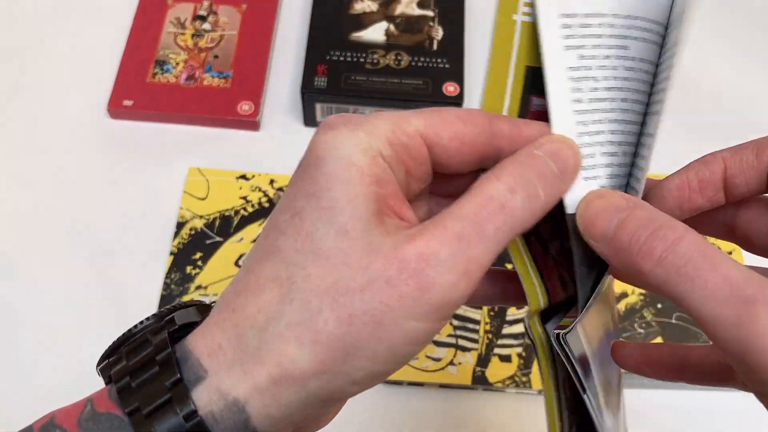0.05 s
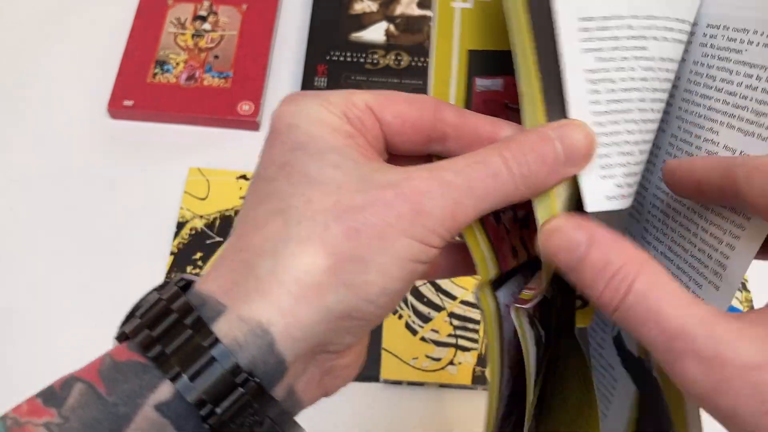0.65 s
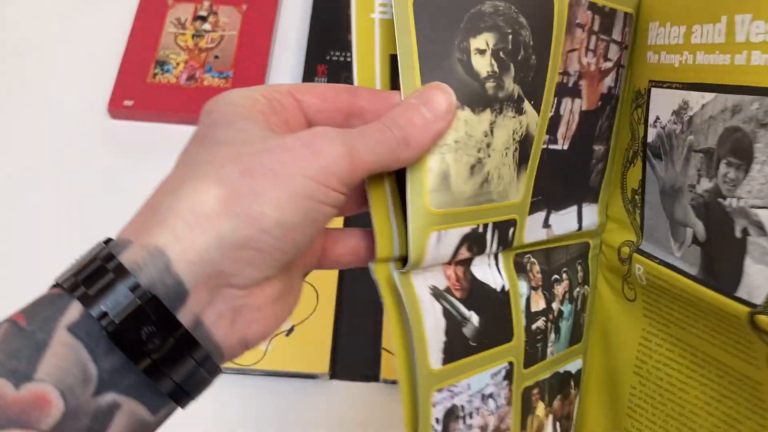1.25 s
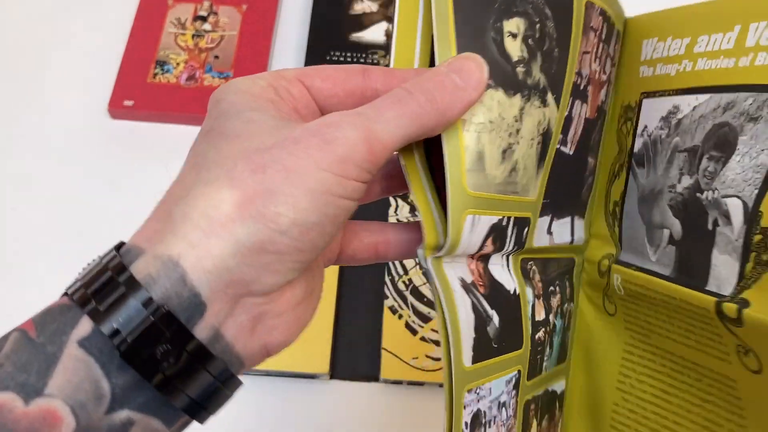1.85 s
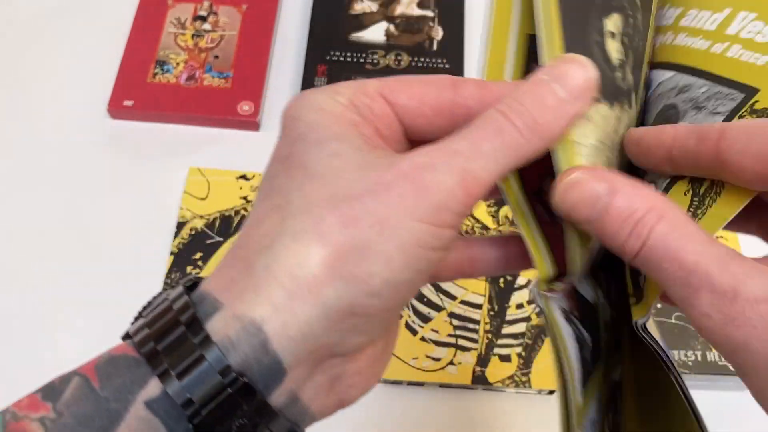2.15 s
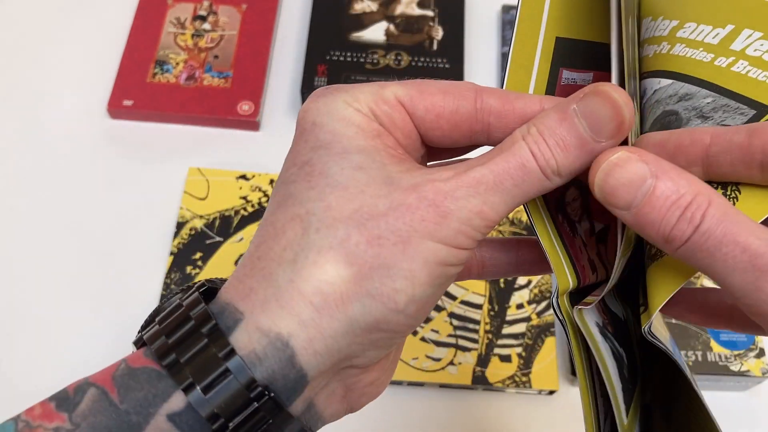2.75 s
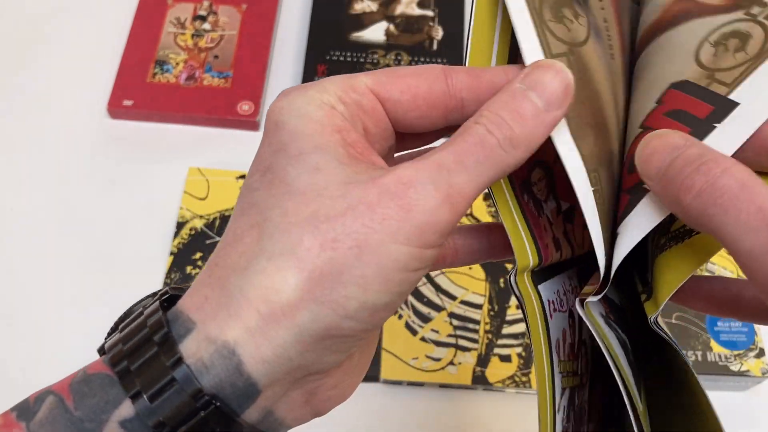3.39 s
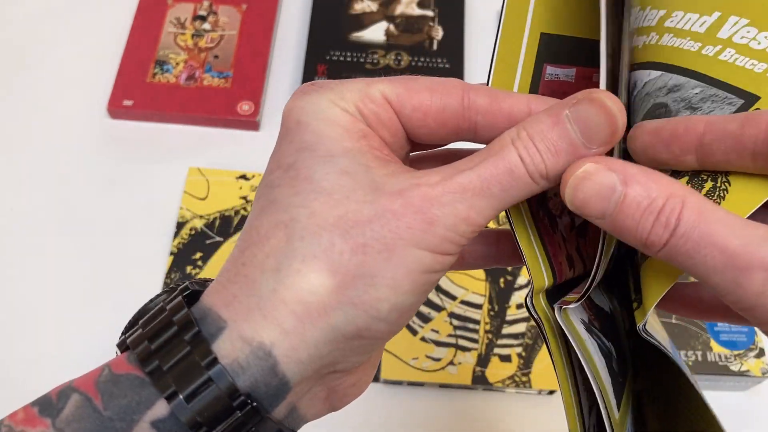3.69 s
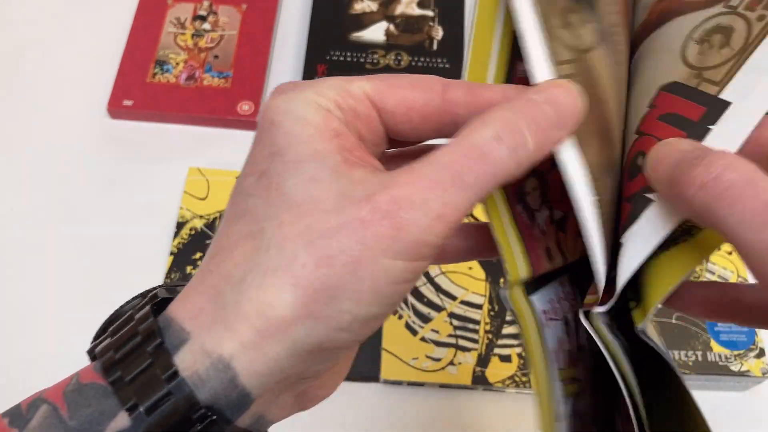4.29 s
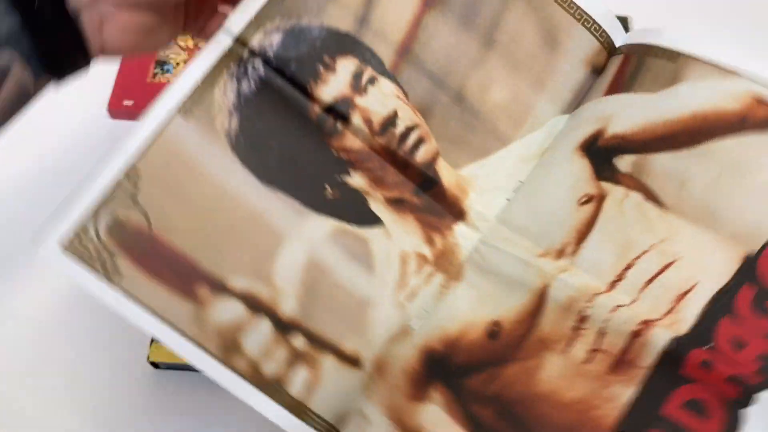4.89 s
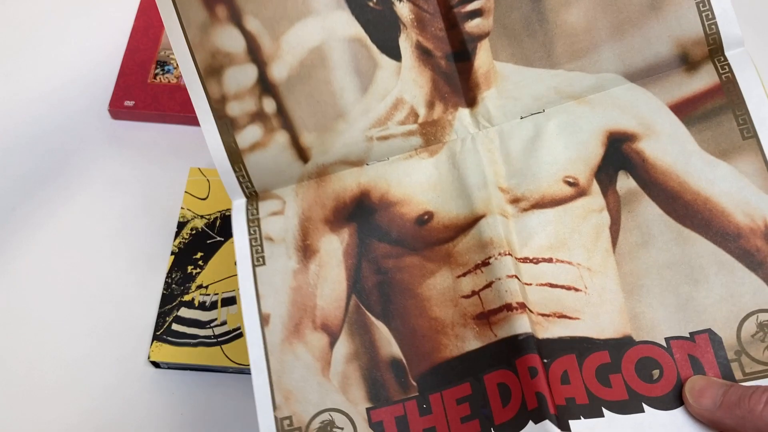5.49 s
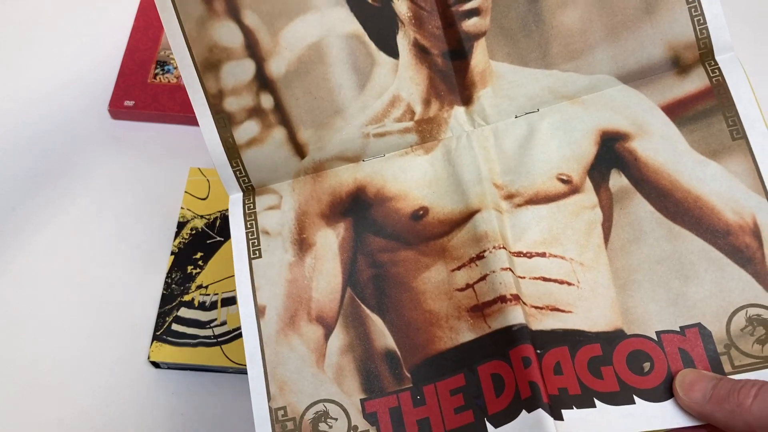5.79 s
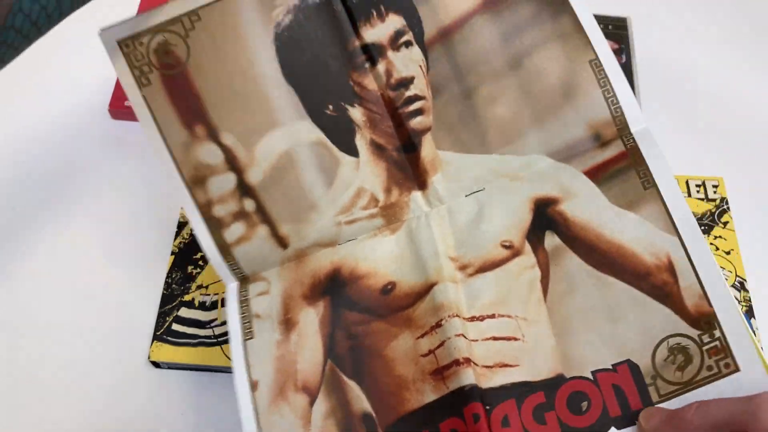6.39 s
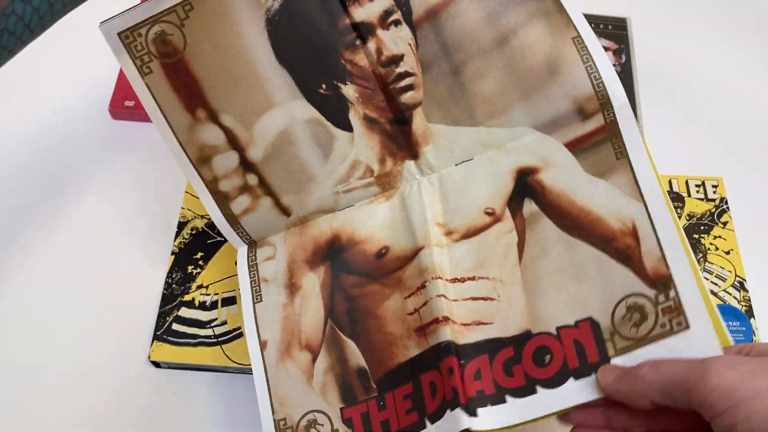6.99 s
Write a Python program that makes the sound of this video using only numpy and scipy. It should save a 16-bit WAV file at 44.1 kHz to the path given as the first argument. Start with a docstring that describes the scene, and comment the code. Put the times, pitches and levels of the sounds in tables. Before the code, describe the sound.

Glossy booklet pages are leafed through close to the microphone in a small, quiet room with a faint low hush. From the start to about 1.8 seconds, quick bright swishes and crinkles overlap, with edge ticks, soft finger bumps and sharp crease cracks around 0.2, 1 and 1.5 seconds. From 2 to 4 seconds the handling is lighter, with short scuffs, tiny dry clicks and brief gaps. At about 4.3 seconds a folded poster is pulled out with a strong swish and two loud snaps, then opens with a deeper rustle, fluttering and more crackles until about 5.4 seconds. The paper goes nearly still, giving two very faint squeaks just before 6 seconds. The open sheet flexes again from 6.1 seconds, with a crack and a dull flap near 6.4, and a last soft swish comes around 7 seconds.

```python
"""Glossy pages swish and scuff over each other, close up, as hands leaf through a booklet.
Then a folded sheet is pulled out and held open, flexing softly. Fibres stick and slip to make the
hiss and rustle, and the wider the paper, the more it flutters. Creases snap through with a crack,
a short ring and a flap; edges tick, fingers bump, the gloss gives two faint squeaks.
The table top and a small quiet room answer, over a low hush."""
import sys
import numpy as np
from scipy import signal
from scipy.fft import rfft, irfft, next_fast_len
from scipy.io import wavfile
from scipy.ndimage import uniform_filter1d, map_coordinates

SR = 44100
rng = np.random.default_rng(int(sys.argv[2]) if len(sys.argv) > 2 else 0)


def to_wav(s):
    """Save 16-bit WAV."""
    ch = np.atleast_2d(s).T  # columns
    pcm = np.round(np.clip(ch, -1, 1) * 32767)  # PCM
    wavfile.write(sys.argv[1], SR, pcm.astype(np.int16))


N = 315226
CLOCK = np.arange(N) / SR
AGE = np.arange(SR // 5) / SR  # time since a contact
PAN = np.array([[.5], [-.5]])  # splits a left-minus-right difference between the channels

# a page slides over its neighbour: t/s, length/s, fastest moment/share of length, hiss/dB, rustle/dB
PAGE_STROKES = [(-.01, 0.071, 0.44, -51, -52), (0.064, 0.13, 0.7, -50, -53.5),
                (0.156, 0.51, 0.26, -55.5, -55), (0.301, 0.16, 0.7, -36.5, -47.5),
                (0.458, 0.17, 0.2, -43, -46), (0.547, 0.059, 0.54, -40, -43), (0.611, 0.12, .12, -52, -55),
                (0.726, 0.16, 0.31, -52.5, -61), (0.804, 0.12, 0.58, -45, -49.5),
                (0.936, 0.22, 0.3, -48, -48.5), (1.107, 0.12, 0.42, -47, -49),
                (1.227, 0.098, 0.16, -58.5, -56), (1.311, 0.085, 0.84, -52, -51),
                (1.468, 0.16, 0.31, -51, -54), (1.585, 0.23, 0.085, -60, -59.5),
                (1.698, 0.24, 0.22, -43.5, -58.5), (1.945, 0.19, 0.47, -54, -62.5),
                (2.072, 0.18, 0.83, -47.5, -52.5), (2.254, 0.075, 0.33, -51.5, -51.5),
                (2.345, 0.076, 0.29, -62, -62.5), (2.456, 0.049, 0.52, -67, -70),
                (2.533, 0.11, 0.14, -61.5, -60.5), (2.613, 0.11, 0.38, -60.5, -63.5),
                (2.779, 0.22, 0.55, -52.5, -59), (3.006, 0.062, 0.73, -53, -58),
                (3.048, 0.11, 0.68, -61.5, -60.5), (3.139, 0.15, 0.56, -48, -54.5),
                (3.308, 0.18, 0.29, -48, -53.5), (3.485, 0.069, 0.32, -65.5, -63),
                (3.555, 0.12, 0.41, -47.5, -53), (3.683, 0.076, 0.37, -57.5, -63),
                (3.811, 0.086, 0.43, -61, -65), (3.903, 0.036, 0.62, -42, -52.5),
                (3.958, 0.074, 0.15, -47, -55.5), (4.092, 0.074, 0.75, -71.5, -73),
                (4.143, 0.13, 0.3, -51, -59.5), (4.211, 0.12, 0.67, -45, -49),
                (4.299, 0.097, 0.66, -39, -46), (4.412, 0.27, 0.25, -45.5, -48),
                (4.693, 0.15, 0.69, -54, -54.5), (4.821, 0.15, 0.52, -48, -55),
                (4.961, 0.38, 0.48, -48.5, -56), (5.327, 0.17, .1, -67, -69.5),
                (5.482, 0.083, 0.31, -75, -61.5), (6.112, 0.12, 0.6, -56.5, -64.5),
                (6.169, 0.28, 0.55, -46.5, -53), (6.433, 0.098, 0.29, -59.5, -60),
                (6.515, 0.059, .2, -72, -78), (6.909, 0.39, 0.34, -50, -57.5)]
# an edge flicks off a finger or another page: t/s, length/s, hiss/dB, rustle/dB
EDGE_FLICKS = [(0.323, 0.011, -38, -66), (0.478, 0.014, -46, -47), (0.511, 0.01, -39, -46),
               (0.613, 0.026, -41.5, -52), (0.76, 0.022, -52, -63), (0.83, 0.018, -36, -42.5),
               (0.887, 0.024, -35, -46.5), (1.009, 0.021, -35.5, -46), (1.139, 0.029, -44, -45),
               (1.257, 0.022, -42.5, -54.5), (1.32, 0.015, -43, -45), (1.354, 0.022, -42, -50.5),
               (1.436, 0.01, -40, -44.5), (1.491, 0.0064, -37, -50), (1.605, 0.012, -45, -45),
               (2.271, 0.023, -41.5, -54), (2.58, 0.0085, -42.5, -51), (2.695, 0.012, -50, -64),
               (2.777, 0.0075, -47, -57), (2.789, 0.027, -55, -53), (3.246, 0.014, -46.5, -48.5),
               (3.342, 0.0091, -57, -53), (4.165, 0.023, -44.5, -51.5), (4.414, 0.013, -49.5, -43),
               (4.464, 0.0056, -44, -39), (5.228, 0.011, -31.5, -44)]
# a wider free sheet rustles deeper: t/s, low rustle against high rustle/dB
FREE_WIDTH = [(0, -9), (.55, -6.5), (.85, -12.5), (1.14, 5), (1.22, -1), (1.42, 0.5), (1.8, -8), (2.2, -7),
              (2.55, -15), (3.3, -20), (4.2, -12), (4.5, -4), (5.1, 7), (5.5, 6), (6.25, -12), (6.43, -8),
              (6.49, 7.5), (7.1, -3)]
# crossfade from the booklet to the folded sheet: t/s, sheet's share/0-1
SHEET_SHARE = [(4.38, 0.25), (4.6, 0.77)]
# the open sheet flexes between the hands: t/s, level/dB
SHEET_FLEX = [(5.3, -93), (5.55, -93), (5.95, -89.5), (6.1, -77.5), (6.55, -68), (6.7, -82.5),
              (6.87, -79.5), (7.14, -68.5)]
# a crease buckles: t/s, crack/dB, its top-octave shelf/dB, ring/dB, ring f/Hz, wave/dB, wave f/Hz, flap/dB
CREASE_SNAPS = [(0.209, -28.5, -22, -53, 3360, -52, 1800, -67),
                (0.9631, -28.5, -6, -38.5, 1190, -48.5, 1200, -67),
                (1.018, -31.5, 11.5, -35.5, 4600, -52, 701, -63),
                (1.101, -29, 5, -30.5, 1296, -35, 900, -47),
                (1.4916, -53, -0.5, -43, 1900, -53.5, 600, -53.5),
                (1.5264, -25, 8, -46.5, 1460, -44, 800, -50), (1.8863, -83, 0, -52.5, 966, -68, 900, -67),
                (2.175, -68, -10, -47, 1463, -56, 300, -55.5),
                (2.7954, -44.5, -17, -56.5, 2300, -60.5, 1013, -71),
                (4.4047, -27, 6.5, -29, 2360, -33, 1160, -46.5),
                (4.4517, -19, 9, -31, 1900, -37, 1100, -53), (4.556, -61, 2, -44.5, 2115, -56, 901, -59),
                (4.574, -50.5, 8.5, -49, 1840, -51, 900, -68),
                (4.6192, -72.5, -2.5, -47, 1450, -46.5, 794, -51.5),
                (4.646, -57, -0.5, -44, 1320, -42.5, 1250, -70),
                (4.696, -62.5, -6, -37, 2284, -56, 700, -59),
                (4.7519, -77, 1, -55.5, 1310, -52, 804, -58.5), (4.765, -75, 0, -59, 1510, -49.5, 900, -58),
                (4.7883, -31, -2, -33, 1780, -38.5, 850, -49), (4.893, -66, -5, -54, 2120, -69, 903, -64),
                (4.918, -72, -5, -57, 1500, -56.5, 445.5, -56), (4.989, -74, -3, -52, 1270, -56, 800, -53),
                (5.1159, -61, -18, -45, 1760, -44, 375, -50.5), (5.203, -72, -3, -57, 1200, -60, 500, -63),
                (5.2384, -38, 10, -32, 3930, -50, 655, -54.5), (5.253, -54, 3, -48, 3130, -62, 701, -59),
                (5.306, -45, -42, -41.5, 2570, -50, 700, -53.5), (5.322, -71, -8, -55, 2800, -66, 700, -67),
                (5.488, -85.5, -2, -60, 1328, -66.5, 698, -65),
                (5.509, -76, 3.5, -45.5, 2060, -54.5, 555, -56),
                (6.228, -80, 0, -58.5, 1120, -47, 280, -59),
                (6.3563, -35.5, -10, -40.5, 1150, -34, 350, -45),
                (6.566, -83, -18, -60.5, 1613, -65, 701, -68.5),
                (6.6307, -90.5, 2, -69, 1096, -72.5, 900, -68),
                (6.929, -54, -45.5, -58.5, 987, -60, 597, -61)]
# a page edge catches and lets go: t/s, click/dB, page body/dB
EDGE_TICKS = [(0.279, -44, -52), (0.288, -40, -48), (0.8342, -38.5, -39), (0.839, -45, -41.5),
              (0.899, -52, -51), (1.0107, -49, -61), (1.2663, -55, -54), (1.3238, -50, -47),
              (1.3571, -47, -45), (1.3662, -61, -50.5), (1.4373, -60, -53), (1.6075, -46.5, -58),
              (2.551, -57, -57), (2.556, -60, -55.5), (2.583, -49, -54.5), (2.835, -51, -63),
              (2.859, -50.5, -62), (2.8875, -49, -59), (3.072, -73, -60), (3.084, -74, -60),
              (3.1133, -56, -55.5), (3.131, -53, -62), (3.658, -50.5, -72), (3.695, -50.5, -81),
              (3.8836, -57, -68), (3.888, -48, -61), (3.895, -51, -57), (3.903, -62, -65),
              (3.913, -54, -58), (3.926, -47, -63), (4.182, -61, -69), (4.219, -48, -55),
              (4.2526, -50, -46), (4.4205, -50, -46), (4.432, -59, -50), (4.461, -45.5, -40),
              (5.555, -70, -81), (6.366, -58, -49.5), (6.373, -66, -49.5), (6.544, -63, -74)]
# soft knocks of fingers and whole sheets: t/s, level/dB, f/Hz
SOFT_BUMPS = [(0.107, -60, 317), (.575, -52.5, 214), (0.981, -51.5, 112), (1.108, -46, 125),
              (2.195, -53.5, 129.9), (3.388, -61, 206), (3.628, -67.5, 290), (4.329, -47.5, 195),
              (5.128, -47.5, 312.4), (6.24, -47, 264.5), (6.363, -47, 116.3), (6.476, -51.5, 384),
              (6.823, -56, 98.3)]
# glossy paper sticks and squeaks: t/s, level/dB, f/Hz
GLOSS_SQUEAKS = [(5.791, -69, 3440), (5.974, -70.5, 8130)]

# bright hiss of the booklet's surface: f/Hz, level/dB
PAGE_HISS_EQ = [(60, -46), (1500, -30), (3500, -14), (5000, -9), (6200, 7.5), (7500, 4), (9500, 4.5),
                (12000, -3.5), (15500, -2.5)]
# softer hiss of the open sheet: f/Hz, level/dB
SHEET_HISS_EQ = [(1500, -25), (3000, -3), (4200, 4), (6200, 1), (7500, 0.5), (9500, -3.5), (12000, -11.5),
                 (15500, -9)]
# crisp rustle of a page's body: f/Hz, level/dB
RUSTLE_EQ = [(40, -40), (500, -20), (1000, -16.5), (1500, -2.5), (2000, 2.5), (3000, 2), (4000, 1),
             (5500, -16), (9000, -31.5)]
# deep rustle of wide paper: f/Hz, level/dB
DEEP_RUSTLE_EQ = [(40, -48.5), (300, -21.5), (620, -10.5), (850, -3), (1150, 0), (1600, -3.5),
                  (2500, -13.5), (5000, -36.5)]
# low flutter of bending pages: f/Hz, level/dB
PAGE_FLUTTER_EQ = [(20, -31.5), (40, -17.5), (60, -4.5), (100, -3), (170, 1.5), (260, 0), (380, -2.5),
                   (500, -12), (620, -20), (1200, -34)]
# low flutter of the open sheet: f/Hz, level/dB
SHEET_FLUTTER_EQ = [(30, -30.5), (80, -20.5), (160, -4.5), (260, -2.5), (350, -3.5), (480, -2.5),
                    (620, -17.5), (1200, -35.5)]
# sharp crack of a crease: f/Hz, level/dB
CRACK_EQ = [(100, -48.5), (600, -28.5), (1500, -10), (3500, 0.5), (5500, 5), (7500, -4), (9700, -1.5),
            (12500, -6.5), (16000, -13)]
# dull flap after a snap: f/Hz, level/dB
FLAP_EQ = [(20, -49.5), (40, -32), (100, -13.5), (200, -9.5), (350, -3.5), (480, -8), (640, -19),
           (1500, -35)]
# modes of a buckled panel: f/ring pitch, level/dB
PANEL_MODES = [(0.601, -10), (0.802, -13), (1, 1), (1.19, -3.5), (1.47, -7), (1.86, -12), (2.4, -15.5),
               (3.099, -14.5)]
# the wash of its many weaker modes: f/ring pitch, level/dB
PANEL_WASH = [(.25, -30), (.6, -6.5), (1, 0), (2.2, -12), (5, -25)]
# a small panel gives off little bass: f/Hz, level/dB
PANEL_RADIATION = [(300, -20), (620, -12), (950, 0)]
# spectrum of a bending wave: f/centre pitch, level/dB
WAVE_SHAPE = [(.04, -26), (.15, -11), (.5, -5.5), (1, 0), (1.5, -2.5), (2.3, -17.5), (6, -48)]
# tone of the bending waves, deep bass cut and slightly hollow near 620 Hz: f/Hz, level/dB
WAVE_EQ = [(25, -36), (90, -4), (450, 0), (620, -5), (850, 0)]

# echoes off hand, pages and table: left delay/s, right delay/s, level/dB
NEAR_ECHOES = [(.00088, 0.00056, -15), (.00118, 0.001, -19), (.0022, 0.0025, -9.5), (.0041, 0.0036, -11.5),
               (.0055, 0.0084, -22)]
# their dull tone: f/Hz, level/dB
ECHO_EQ = [(2500, 2.5), (6000, -8.0), (14000, -19.0)]
# the small room's decay: f/Hz, t60/s
ROOM_DECAY = [(150, 0.6), (1000, 0.05), (4000, 0.19), (14000, 0.037)]
# stereo width of its tail: f/Hz, side level/dB
ROOM_WIDTH = [(3500, -2.5), (5200, -12.0)]
# room tone: f/Hz, level/dB
HUSH_EQ = [(20, -30.5), (45, 3), (100, 8.5), (150, -5), (400, -17), (650, -33), (1000, -14), (2000, -37),
           (5000, -33), (8500, -32.5), (15500, -30.5)]
# phase across the microphone pair: f/Hz, lag of the right/rad
MIC_LAG = [(0, 0), (350, .05), (1000, .7), (2200, 1.4), (3200, 1.5), (5500, 3.14), (8600, 6.28),
           (11700, 9.42), (15000, 12.57), (17000, 13.5)]
# balance across the pair: f/Hz, left minus right/dB
MIC_TILT = [(50, -0.5), (130, -5), (300, -2), (1000, -5), (2200, -3.5), (4000, -2.5), (7000, -0.5)]

SWELL_DB, SWELL_SHAPE = 10.5, 1.6  # depth of a stroke's swell; roundness of its top
EASE_IN, RELEASE_S = .1, .13  # share of a stroke spent getting moving; t60 of coming to rest
HELD_HISS_DB, HELD_RUSTLE_DB, HELD_FLUTTER_DB = -82.5, -91.5, -77.5  # even held paper stirs
FLUTTER_DB, FLUTTER_GROWS = -8, .87  # against the rustle; dB per dB of width
SHEET_FLUTTER_DB, FLEX_FLUTTER_DB = 1, 5  # extra for the open sheet; against the rustle of flexing
KINK_DB, LIGHT_RUB_DB, KINK_BLUR = -10, -52, .8  # kinks in a light rub; its hiss; dB lost per dB above
CATCH_DB, CATCH_HZ, CATCH_OCTAVES, CATCH_CYCLES = -5, 2350, .55, 30  # against rustle; pitch; spread; t60
WAVE_TRAVEL_S, WAVE_REF_HZ, DISPERSION = .0028, 700, .9  # travel time at this pitch; power of bass lag
SHEET_PAN_DB, WAVE_PAN_DB = 1.5, -4  # left minus right
TOP_HZ = 16000


def sliding():
    """Pages rub: the surface hisses, the body rustles, and the wider the paper the more it flutters."""
    hiss, rustle = rubbing()
    width = amp(np.interp(CLOCK, *np.transpose(FREE_WIDTH)))
    flex = amp(np.interp(CLOCK, *np.transpose(SHEET_FLEX)))
    flutter = rustle * width ** FLUTTER_GROWS * amp(FLUTTER_DB + SHEET_FLUTTER_DB * opened())
    flutter = np.hypot(flutter, amp(HELD_FLUTTER_DB))
    flutter = np.hypot(flutter, amp(FLEX_FLUTTER_DB) * flex)
    grip = amp(.9 * wobble(45) + 1.2 * wobble(300))  # stick and slip make the rub grainy
    # small kinks sound in hiss and rustle at once, and stand out most in a light rub
    blur = np.maximum(hiss / amp(LIGHT_RUB_DB), 1) ** KINK_BLUR
    crinkle = amp(KINK_DB) / blur * slips(rate=70, spread_db=3.2)[0]
    fine = friction(rate=1200, spread_db=3.5, grain_db=-6, patchy_db=2, side_db=-18) + crinkle
    coarse = friction(rate=450, spread_db=3.5, grain_db=-3, patchy_db=3.6, side_db=-7) + crinkle
    broad = friction(rate=200, spread_db=2.5, grain_db=-5, patchy_db=3, side_db=-2.5)
    slow = friction(rate=40, spread_db=5, grain_db=-16.5, patchy_db=3, side_db=-4)
    grit = amp(CATCH_DB) * (1 - .5 * opened()) * catches(rate=260, spread_db=15)
    high_rustle = rustle / np.hypot(1, width)
    crisp = high_rustle * unit(unit(colour(coarse, RUSTLE_EQ)) + grit)
    deep = np.hypot(width * high_rustle, flex) * unit(colour(broad, DEEP_RUSTLE_EQ))
    surface = hiss * through_paper(fine, PAGE_HISS_EQ, SHEET_HISS_EQ)
    bending = flutter * through_paper(slow, PAGE_FLUTTER_EQ, SHEET_FLUTTER_EQ)
    return grip * (surface + crisp + deep) + bending


def rubbing():
    """Envelopes of hiss and rustle: strokes and flicks add in power."""
    hiss = np.full(N, amp(HELD_HISS_DB) ** 2)
    rustle = np.full(N, amp(HELD_RUSTLE_DB) ** 2)
    for start, length, fastest, hiss_db, rustle_db in PAGE_STROKES:
        swell = stroke(length, fastest)
        add(hiss, start, (amp(hiss_db) * swell) ** 2)
        add(rustle, start, (amp(rustle_db) * swell) ** 2)
    for start, length, hiss_db, rustle_db in EDGE_FLICKS:
        flick = np.interp(AGE, [0, .003, .74 * length, 1.3 * length], [.029, .84, .98, .0088])
        add(hiss, start, (amp(hiss_db) * flick) ** 2)
        add(rustle, start, (amp(rustle_db) * flick) ** 2)
    return np.sqrt(hiss), np.sqrt(rustle)


def stroke(length, fastest):
    """A page speeds up, slows down and comes to rest; a long pull has a softer attack."""
    t = np.arange(int((length + RELEASE_S) * SR)) / SR
    attack = np.minimum(t / (EASE_IN * length), 1)
    slowness = np.interp(t, [0, np.clip(fastest, .02, .98) * length, length], [1, 0, 1])
    resting = np.maximum(t - length, 0) / RELEASE_S
    return attack * amp(-SWELL_DB * slowness ** SWELL_SHAPE - 60 * resting)


def friction(rate, spread_db, grain_db, patchy_db, side_db):
    """Countless fibre slips and a few larger ones; a broad sheet sounds a little different each side."""
    fibres = rng.standard_normal((2, N)) + amp(grain_db) * slips(rate, spread_db)
    bands = signal.stft(fibres, nperseg=512)[2]
    patches = rng.standard_normal(bands.shape[1:])  # random gains, smoothed over pitch and time
    patches = uniform_filter1d(patches, size=3, axis=0)
    patches = uniform_filter1d(patches, size=12, axis=1)
    mid, side = signal.istft(bands * amp(patchy_db * unit(patches)), nperseg=512)[1][:, :N]
    return mid + amp(side_db) * np.array([side, -side])


def slips(rate, spread_db):
    """Sparse slips of very unequal size, rate a second, as mid and side."""
    count = int(rate * N / SR)
    when = rng.integers(N, size=(2, count))
    sizes = amp(spread_db * np.minimum(rng.exponential(size=(2, count)), 4))
    sizes *= rng.choice([-1, 1], (2, count))
    return unit(np.array([np.bincount(i, size, N) for i, size in zip(when, sizes)]))


def catches(rate, spread_db):
    """A sliding edge catches and lets go, each time ringing another patch of the page."""
    out, t = np.zeros(N), AGE[:SR // 40]
    for when, height, size in zip(*rng.random((3, int(rate * N / SR)))):
        hz = CATCH_HZ * 2 ** (CATCH_OCTAVES * (2 * height - 1 + rng.standard_normal((3, 1)) / 2))
        ring = np.sin(2 * np.pi * hz * t) * amp(-60 * t * hz / CATCH_CYCLES)
        add(out, when * N / SR, amp(spread_db * size) * ring.sum(axis=0))
    return unit(out)


def through_paper(x, booklet_eq, sheet_eq):
    """Friction takes its tone mostly from the booklet at first, then mostly from the open sheet."""
    share = opened()
    return (1 - share) * unit(colour(x, booklet_eq)) + share * unit(colour(x, sheet_eq))


def opened():
    """The open sheet's share of the sound over time."""
    return np.interp(CLOCK, *np.transpose(SHEET_SHARE))


def snaps():
    """A crease cracks and crunches, its panel rings, and the wider sheet flaps a moment later."""
    out = np.zeros(N)
    for s, crack_db, top_db, ring_db, hz, _, _, flap_db in CREASE_SNAPS:
        crack_eq = [(f, db + top_db * np.interp(f, [6500, 11000], [0, 1])) for f, db in CRACK_EQ]
        wash_eq = [(hz * ratio, db) for ratio, db in PANEL_WASH]
        crack = burst(crack_eq, rise=.0005, t60=.0058)
        ring = colour(panel(hz, cycles=18), PANEL_RADIATION)
        wash = colour(burst(wash_eq, rise=.00027, t60=.009), PANEL_RADIATION)
        settling = burst(RUSTLE_EQ, rise=.00029, t60=.055)
        fibres_giving = crunch(CRACK_EQ, rate=1400, rise=.001, t60=.05)
        flap = crunch(FLAP_EQ, rate=1500, rise=.0015, t60=.055)  # the wave's ragged return from the edges
        add(out, s + .0002, amp(crack_db) * crack + amp(ring_db) * ring)
        add(out, s + .0005, amp(ring_db - 4.5) * wash)
        add(out, s, amp(ring_db - 12.5) * settling)
        add(out, s + .002, amp(crack_db - 13) * fibres_giving)
        add(out, s + .005, amp(flap_db) * flap)
    return out


def panel(hz, cycles):
    """Heavily damped paper modes, a little different for every buckle."""
    ratio, db = np.transpose(PANEL_MODES)[:, :, None]
    detune, strength, phase = rng.standard_normal((3, len(PANEL_MODES), 1))
    f = hz * ratio * (1 + .078 * detune * (ratio != 1))
    modes = amp(db + 2 * strength) * np.sin(2 * np.pi * (f * AGE + phase))
    decay = fade(rise=.00013, t60=cycles / np.sqrt(f * hz))
    return unit_hit((modes * decay).sum(axis=0))


def crunch(eq, rate, rise, t60):
    """A ragged, dying run of tiny buckles, rate a second."""
    buckles = (rng.random(len(AGE)) < rate / SR) * rng.standard_normal(len(AGE))
    return unit_hit(colour(buckles * fade(rise, t60), eq))


def waves():
    """Every snap sends a bending wave through its sheet."""
    out = np.zeros(N)
    for s, *_, wave_db, wave_hz, _ in CREASE_SNAPS:
        add(out, s, amp(wave_db) * bending_wave(wave_hz))
    return colour(out, WAVE_EQ) * amp(PAN * WAVE_PAN_DB)


def bending_wave(hz):
    """Short waves outrun long ones across the sheet, so one push arrives as a quick falling chirp."""
    f = np.fft.rfftfreq(len(AGE), 1 / SR)
    delay = WAVE_TRAVEL_S * amp(rng.standard_normal()) * (WAVE_REF_HZ / (f + 30)) ** DISPERSION
    phase = 2 * np.pi * (np.cumsum(delay) * f[1] + rng.random())
    gain = amp(along([(hz * ratio, db) for ratio, db in WAVE_SHAPE], f))
    chirp = irfft(gain * np.exp(-1j * phase), len(AGE))
    return unit_hit(chirp * np.linspace(1, 0, len(AGE)))


def ticks():
    """Tiny dry clicks of page edges, with a little of the page's body."""
    out = np.zeros(N)
    for s, click_db, body_db in EDGE_TICKS:
        add(out, s, amp(click_db) * burst(PAGE_HISS_EQ, rise=.0003, t60=.008))
        add(out, s, amp(body_db) * burst(RUSTLE_EQ, rise=.0003, t60=.011))
    return out


def bumps():
    """A soft push sets a whole sheet swinging for a few cycles."""
    out = np.zeros(N)
    soft_attack = 1 - np.exp(-AGE / .0045)
    for s, db, hz in SOFT_BUMPS:
        add(out, s, amp(db) * unit_hit(panel(hz, cycles=12) * soft_attack))
    return out


def squeaks():
    """A short, nearly regular run of slips sings as a wavering tone."""
    out = np.zeros(N)
    for s, db, hz in GLOSS_SQUEAKS:
        pitch = hz * (1 + .05 * wobble(370)[:len(AGE)])
        tone = np.sin(2 * np.pi * np.cumsum(pitch) / SR)
        add(out, s, amp(db) * unit_hit(tone * fade(rise=.0034, t60=.025)))
    return out


def near_echoes(x):
    """Short, dull echoes whose paths drift as the hands move, so that the colour shifts."""
    dull = colour(x, ECHO_EQ)
    out = np.zeros((2, N))
    for *delays, db in NEAR_ECHOES:
        stretch = 1 + .1 * wobble(1.5)
        for channel, delay in enumerate(delays):
            out[channel] += amp(db) * np.interp(CLOCK - delay * stretch, CLOCK, dull[channel])
    return out


def walls(x, predelay_s):
    """A diffuse tail, wide only below the treble; each frequency dies at its own speed."""
    hz, t, bands = signal.stft(rng.standard_normal((2, SR // 2)), SR, nperseg=256)
    decay = amp(-60 * t / along(ROOM_DECAY, hz)[:, None])
    mid, side = signal.istft(bands * decay, SR, nperseg=256)[1]
    side = colour(side, ROOM_WIDTH)
    tail = np.array([mid + side, mid - side]) / np.linalg.norm(mid)
    tail = np.pad(tail, ((0, 0), (round(predelay_s * SR), 0)))
    return signal.fftconvolve(x, tail, axes=1)[:, :N]


def hush():
    """The room's own low, steady tone, nearly mono."""
    return unit(colour(rng.standard_normal(N) + .34 * rng.standard_normal((2, N)), HUSH_EQ))


def amp(db):
    """Decibels to gain."""
    return 10 ** (np.asarray(db) / 20)


def unit(x):
    """Scaled to rms 1."""
    return x / np.sqrt(np.mean(x ** 2) + 1e-20)


def unit_hit(x):
    """Scaled to the energy of 10 ms at rms 1."""
    return x * np.sqrt(SR / 100 / (np.sum(x ** 2) + 1e-20))


def along(points, hz):
    """A curve of (f/Hz, value) points read on a log axis."""
    f, value = np.transpose(points)
    return np.interp(np.log(hz + 1), np.log(f + 1), value)


def wobble(rate):
    """A smooth random curve with rate knots a second."""
    knots = rng.standard_normal(int(N * rate / SR) + 4)
    steps = np.arange(0, len(knots) - 1, 1 / 10)
    return np.interp(CLOCK * rate, steps, map_coordinates(knots, [steps]))


def colour(x, eq):
    """Minimum-phase EQ: nothing rings ahead of an attack."""
    n = x.shape[-1]
    size = 2 * next_fast_len(n // 2 + 2048)
    gain = amp(along(eq, np.fft.rfftfreq(size, 1 / SR)))
    cepstrum = irfft(np.log(gain), size)
    cepstrum[1:size // 2] *= 2
    cepstrum[size // 2 + 1:] = 0
    return irfft(rfft(x, size) * np.exp(rfft(cepstrum)), size)[..., :n]


def add(track, s, sound):
    """Mix a sound into a track at s seconds."""
    part = track[max(round(s * SR), 0):][:len(sound)]
    part += sound[:len(part)]


def fade(rise, t60):
    """Envelope of a contact: quick rise, exponential decay, both in seconds."""
    return (1 - np.exp(-(AGE / rise) ** 2)) * amp(-60 * AGE / t60)


def burst(eq, rise, t60):
    """A dying puff of coloured noise."""
    return unit_hit(colour(rng.standard_normal(len(AGE)) * fade(rise, t60), eq))


def scene():
    """Paper up front; behind it the near echoes, the walls and the room tone."""
    paper = sliding() + snaps() + waves() + ticks() + bumps() + squeaks()
    paper *= amp(PAN * SHEET_PAN_DB * opened())
    room_tone = amp(-71.5) * hush()
    return paper + near_echoes(paper) + amp(-18) * walls(paper, predelay_s=.012) + room_tone


def record(dry):
    """The microphone pair shifts phase and level between the channels; a steep high cut tops it off."""
    size = next_fast_len(N + SR // 2)
    hz = np.fft.rfftfreq(size, 1 / SR)
    balance = amp(PAN * along(MIC_TILT, hz))
    balance /= np.sqrt(np.mean(balance ** 2, axis=0))
    phase = np.exp(1j * PAN * np.interp(hz, *np.transpose(MIC_LAG)))
    high_cut = np.clip((TOP_HZ - hz) / 500 + .5, 0, 1)
    return irfft(rfft(dry, size) * balance * phase * high_cut, size)[:, :N]


dry = scene()
out = record(dry)
to_wav(out)
```